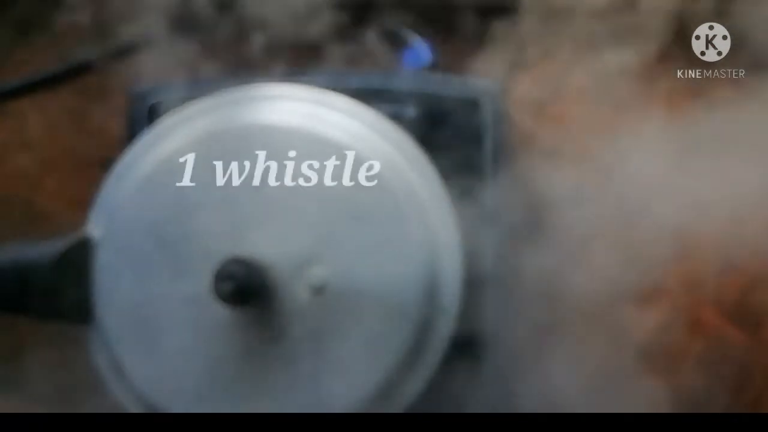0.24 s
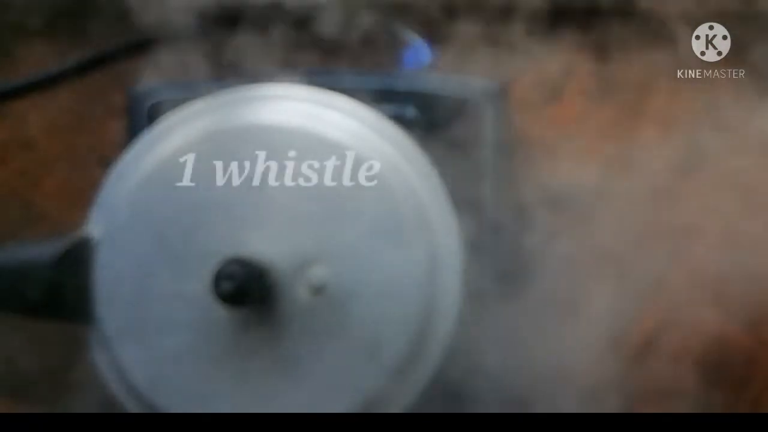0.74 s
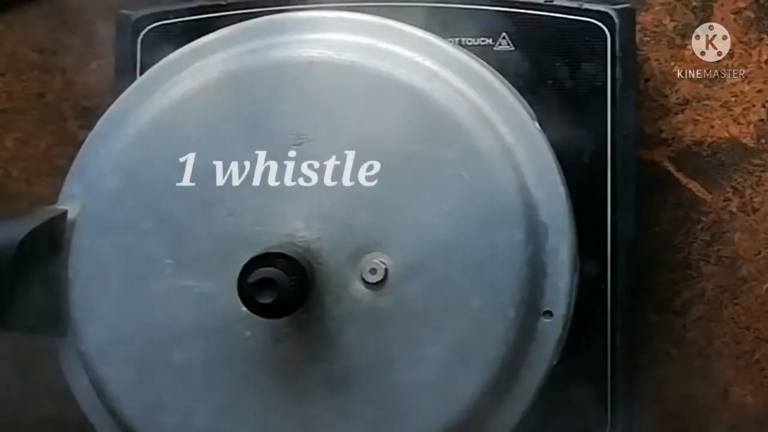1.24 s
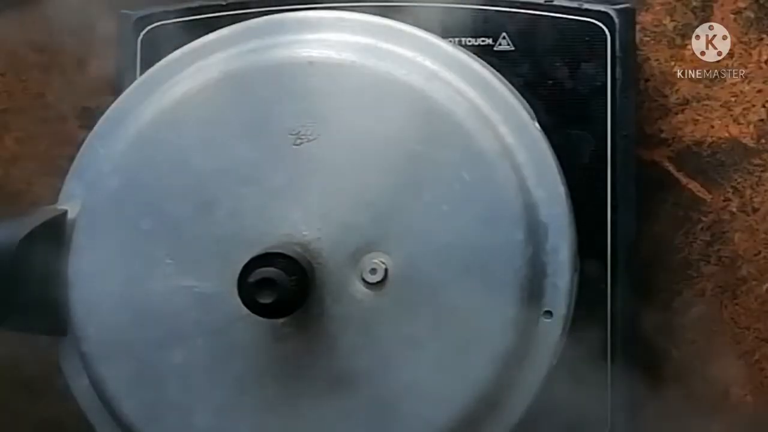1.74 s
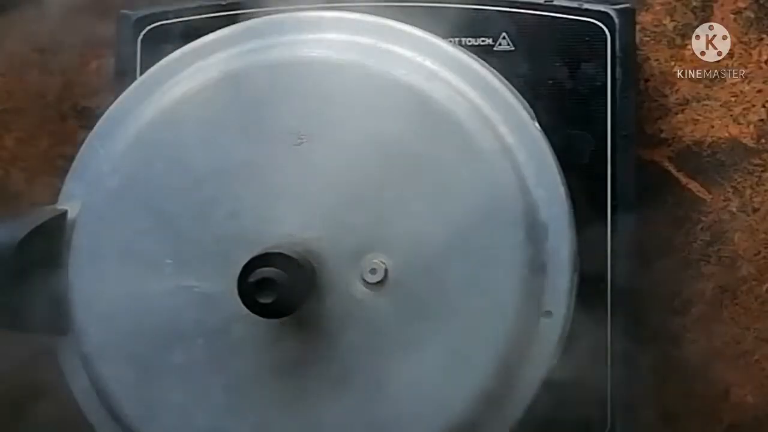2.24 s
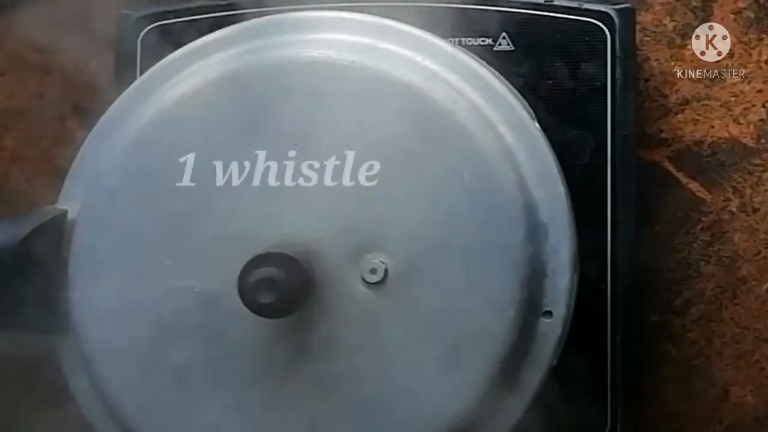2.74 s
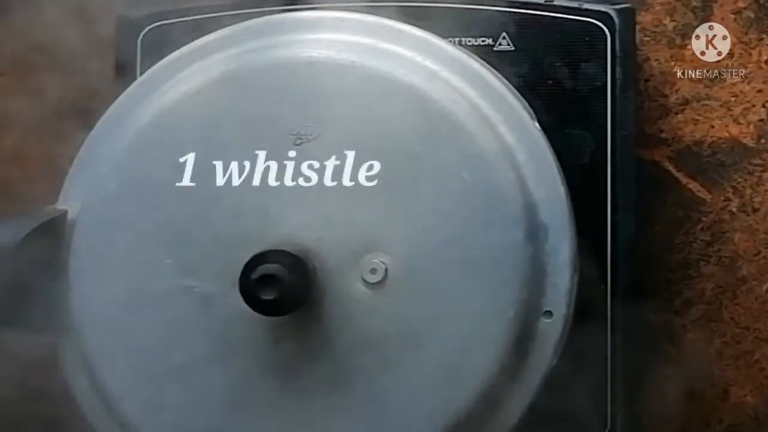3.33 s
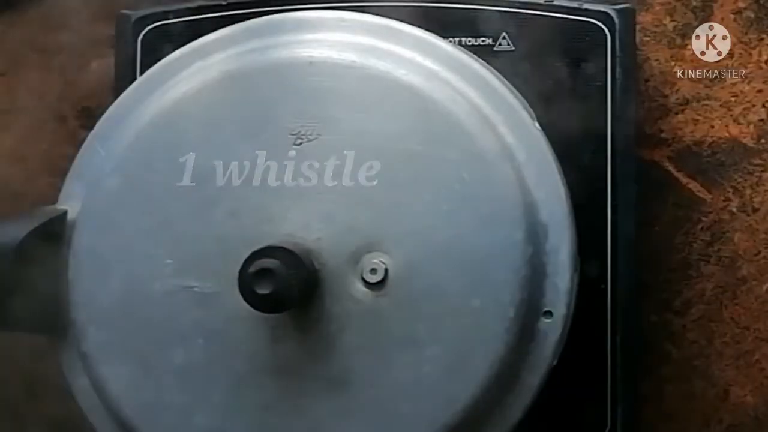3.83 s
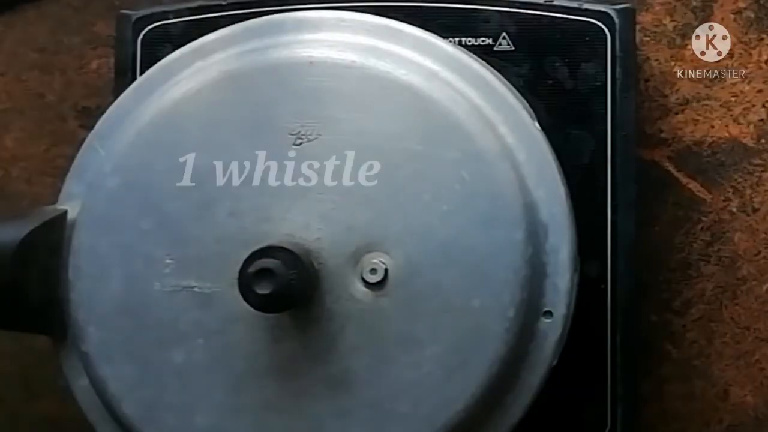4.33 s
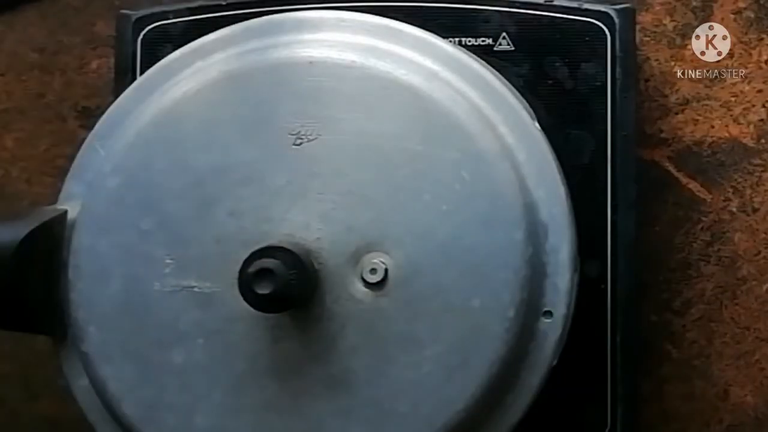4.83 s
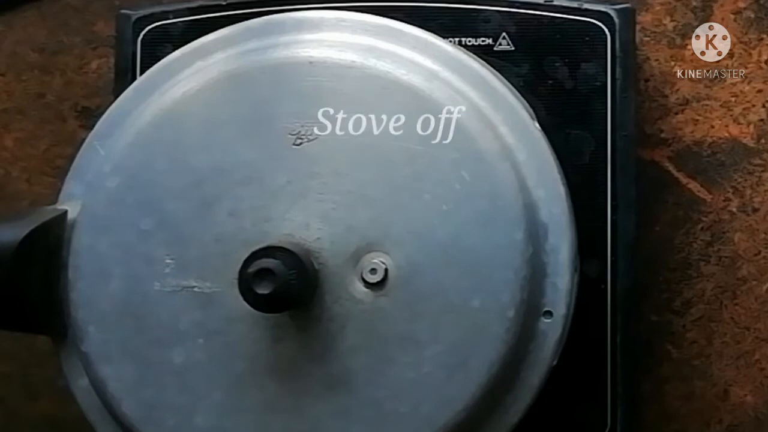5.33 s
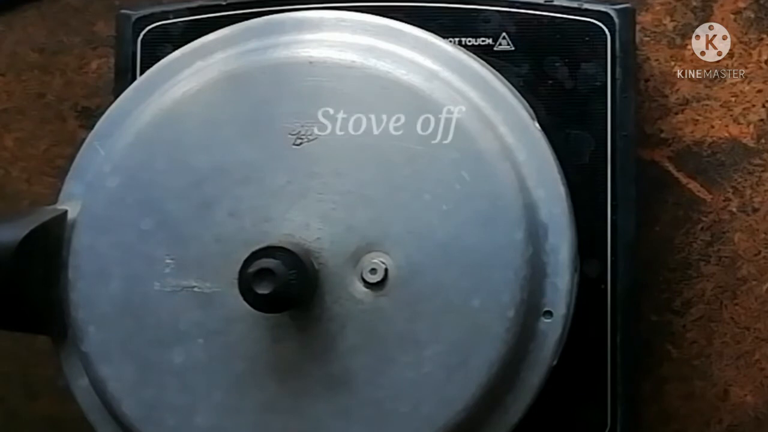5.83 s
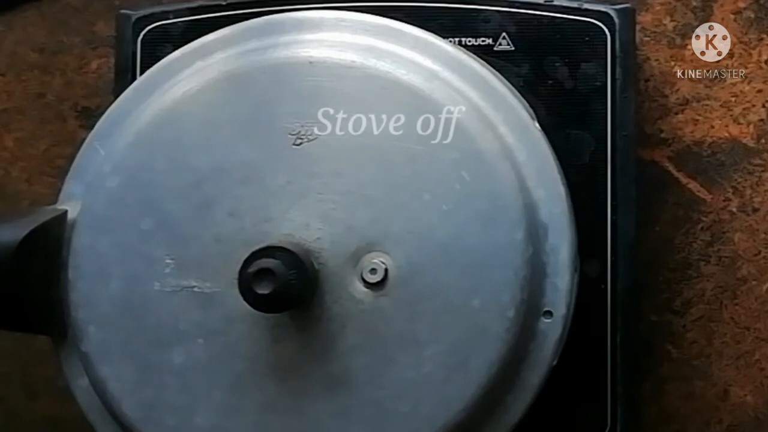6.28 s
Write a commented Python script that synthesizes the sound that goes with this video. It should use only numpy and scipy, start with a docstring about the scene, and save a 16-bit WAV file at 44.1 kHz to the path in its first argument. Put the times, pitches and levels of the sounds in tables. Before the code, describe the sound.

Close to the microphone, piercing steam with a low gusty rumble and breathy whistling tones roars from a cooker. The weight sinks, clatters on its seat, lifts for a longer blast and falls shut, bouncing softly. Only a cooling fan's airy hum remains, slowly creeping up, with tiny bird notes far away. Late on, a sudden hard clack chatters and rings metallically in the reflective kitchen, then a barely audible narrow hiss and a last peep.

```python
"""A pressure cooker is already blowing steam past its weight in a small, hard-walled kitchen.
The weight sinks, rattles with a short spurt, lifts again, then drops shut, and the hiss dies away.
A distant bird peeps faintly; a sharp clack then rings, and a thin hiss sets in before a last peep.
A fan hums throughout. Noise makes steam, air and chatter; sines make knocks, ringing, peeps and hum.
Gain control turns everything down under the loud steam and lets it creep back."""
import sys
import numpy as np
from scipy import signal
from scipy.fft import rfft, irfft, next_fast_len
from scipy.io import wavfile
from scipy.ndimage import uniform_filter1d

SR = 44100
rng = np.random.default_rng(int(sys.argv[2]) if len(sys.argv) > 2 else 0)


def store_pcm(level_fs):
    """Save levels as 16-bit WAV."""
    pcm = np.round(np.clip(level_fs, -1, 1) * 32767).astype(np.int16)
    wavfile.write(sys.argv[1], SR, np.atleast_2d(pcm).T)


N = 288855  # length in samples
TIME = np.arange(N) / SR
HZ = np.fft.rfftfreq(N, 1 / SR)


def amp(db):
    """Turns decibels into gain."""
    return 10 ** (np.asarray(db) / 20)


def read(points, hz, axis=1):
    """Reads one table column, joined by straight lines on a log-frequency axis."""
    table = np.array(points, float)
    return np.interp(np.log(hz + 1), np.log(table[:, 0] + 1), table[:, axis])


def shaped(x, gain):
    """Filters x by a gain for each frequency."""
    size = next_fast_len(N + 8192, True)
    bins = np.fft.rfftfreq(size, 1 / SR)
    return irfft(rfft(x, size) * np.interp(bins, HZ, gain), size)[..., :N]


def drift(rate_hz):
    """Makes a random wander of unit size, mostly slower than rate_hz."""
    x = shaped(rng.standard_normal(N), np.exp(-(HZ / rate_hz) ** 2))
    return x / x.std()


def add(mix, s, sound):
    """Lays a sound into the mix at s seconds."""
    part = mix[round(s * SR):][:len(sound)]
    part += sound[:len(part)]


def steam(flutter_db=2.39, flutter_hz=50):
    """The same fluttering flow of steam drives the bright jets and the low plume."""
    opening, bright_db = valve()
    flow = opening * amp(flutter_db * drift(flutter_hz))
    return jets(flow, amp(bright_db)) + plume(flow)


# Steam lifts the weight; the first lift is already under way.
# Each row: start in seconds, drop in seconds, relative flow in dB, relative treble brightness in dB.
LIFTS = [(-.3, 0.901, -3.5, -1), (0.99, 3.344, -4, -2)]
RISE_S, SHUT_S = 0.17, 0.0026  # the weight climbs steadily and falls quickly
SAG_DB_PER_S = 0.3  # the pot loses pressure while it blows
LEAK_DB, LEAK_S = -28.5, 0.18  # steam leaks on until the weight has settled
SPUTTER_DB, SPUTTER_HZ = 10, 35  # the rocking weight chops the leak
DULLING = 0.19  # dB of brightness lost for each dB less flow
SPURT_AT_S, SPURT_DB, SPURT_S = 0.945, -8, 0.014  # the weight hops once between the lifts


def valve():
    """Each lift opens the vent, holds, then drops to a short leak; gives flow and brightness in dB."""
    flow, tone = np.zeros((2, N))
    for start, drop, db, bright_db in LIFTS:
        up, down = np.maximum(TIME - start, 0), np.maximum(TIME - drop, 0)
        sputter_db = SPUTTER_DB * np.tanh(drift(SPUTTER_HZ))
        leak = amp(LEAK_DB + sputter_db) * np.exp(-(down / LEAK_S) ** 4)
        closing = np.maximum(np.exp(-down / SHUT_S), leak)
        lift = amp(db - SAG_DB_PER_S * up) * np.minimum(up / RISE_S, 1) * closing
        flow += lift
        tone += lift * bright_db
    add(flow, SPURT_AT_S, amp(SPURT_DB) * np.exp(-(TIME / SPURT_S) ** 4))
    flow += 1e-6  # avoids dividing by zero
    return flow, tone / flow + DULLING * 20 * np.log10(flow)


# How loud the hiss of the jets is at each pitch.
# Each row: frequency in Hz, relative level in dB.
JET_COLOUR = [(100, -65), (400, -47), (1000, -34.5), (1600, -29), (2400, -22.5), (2850, -23), (3150, -18.5),
              (4400, -18), (6000, -14.5), (8000, -13.5), (10000, -13), (12000, -12.5), (15200, -19.5)]
# The weight turns and aims its jets elsewhere.
# Each row: time in seconds, extra fizz in dB, left minus right in dB.
TURNING = [(0, 1.5, -0.5), (0.6, 1.5, 0.5), (0.87, 2, -0.5), (1.25, -0.5, -0.5), (1.6, 0.3, 0),
           (1.9, 0.8, 1.7), (2.35, -0.5, -0.5), (2.6, -1.3, -0.5), (3.33, 0.4, -1)]


def jets(flow, bright, jet_db=0.72, wet_db=0, turns_per_s=0.606, count=3):
    """Turbulent jets leave the holes of the weight: more pressure makes them louder and brighter."""
    at, *columns = np.transpose(TURNING)
    fizz_db, side_db = (np.interp(TIME, at, column) for column in columns)
    colour = amp(read(JET_COLOUR, HZ) + jet_db)
    low = 1 / (1 + (HZ / 3800) ** 4)
    top = 1 - 1 / (1 + (HZ / 9000) ** 4)
    lead = SR // 2  # half a second of earlier steam has already filled the room
    hiss = np.zeros((2, N))
    for k, noise in enumerate(rng.standard_normal((count, N))):
        roar, body, fizz = (shaped(noise, colour * share) for share in (low, 1 - low - top, top))
        # the tilting weight favours each hole in turn
        turn = 2 * np.pi * (turns_per_s * TIME + k / count)
        lean = np.sqrt((1 + 0.5 * np.sin(turn)) / count)
        # a faster jet trades roar for fizz
        jet = lean * flow * (roar / bright + body + whistle() + fizz * bright * amp(fizz_db))
        # each jet points elsewhere and meets other walls
        hiss += kitchen(np.r_[jet[:lead][::-1], jet], wet_db, lag=28)[:, lead:]
    return hiss * amp(np.array([side_db, -side_db]) / 2)


# Breathy tones of the vent.
# Each row: frequency in Hz, width in Hz, relative level in dB.
VENT_TONES = [(6125, 80, -43.5), (7230, 35, -53), (7080, 27, -35), (7220, 57, -38.5)]


def whistle(waver=0.003, waver_hz=5):
    """The vent's breathy tones are narrow bands of noise that wander together in pitch."""
    bend = np.cumsum(1 + waver * drift(waver_hz)) / SR
    out = np.zeros(N)
    for hz, width, db in VENT_TONES:
        breath = drift(width) + 1j * drift(width)
        out += amp(db) * (breath * np.exp(2j * np.pi * hz * bend)).real
    return out


# The turbulent plume buffets the air.
# Each row: frequency in Hz, relative noise level in dB.
PLUME_RUMBLE = [(20, -39), (80, -34), (150, -37), (300, -37.5), (550, -38.5), (1000, -37.5), (2500, -79)]
# Puffs of the plume brush the microphone.
# Each row: middle in seconds, spread in seconds, extra level in dB.
PUFFS = [(0.766, 0.019, 10.5), (0.882, 0.026, 9.5), (1.14, 0.018, 6.5), (1.482, 0.049, 1.5),
         (2.454, 0.01, 3), (3.327, 0.028, 7)]


def plume(flow, plume_db=7.5, wet_db=-3):
    """The turbulent cloud of steam rumbles in gusts, with short puffs at the microphone."""
    gust_db = 1.3 * drift(18)
    for at, spread, db in PUFFS:
        gust_db += db * np.exp(-((TIME - at) / spread) ** 2)
    rumble = shaped(rng.standard_normal(N), amp(read(PLUME_RUMBLE, HZ)))
    return kitchen(flow * rumble * amp(plume_db + gust_db), wet_db, lag=28)


# The weight knocks on its seat.
# Each row: start in seconds, relative level in dB, centre of the knock in Hz.
KNOCKS = [(0.9274, -21.5, 1600), (0.9552, -27, 1660), (0.9829, -26.5, 1400), (0.991, -33, 790),
          (1.0107, -28.5, 935), (1.029, -38, 800), (1.061, -41, 850), (3.3682, -30, 960),
          (3.4123, -30.5, 1800), (3.415, -32.5, 900), (3.4372, -36.5, 800), (3.439, -35, 1950),
          (3.4547, -35, 1200), (3.462, -39, 890), (3.473, -38, 1730), (3.485, -44.5, 920),
          (3.543, -45.5, 1000), (3.567, -47, 930)]
# Ways the lid under the weight can ring.
# Each row: nominal frequency in Hz, relative level in dB, time to fall by 60 dB in seconds.
LID_MODES = [(356, 8.5, 0.28), (690, 3, 0.022), (800, -1, 0.059), (905, -1.5, 0.087), (1063, 2, 0.032),
             (1370, 0.5, 0.035), (1795, 2.5, 0.032), (1860, -8, 0.034), (1950, -2, 0.027)]


def weight(knock_db=-0.5, wet_db=-6.0, octaves=0.35, rebound_db=-14, rebound_s=0.028, detune=0.042, count=3):
    """As the flow fails, the weight bounces on the vent and rings the lid, each touch a bit different."""
    out, t = np.zeros(N), np.arange(SR // 5) / SR
    for s, db, centre_hz in KNOCKS:
        # it rocks and touches again, ever more lightly
        touches = s + np.r_[0, np.cumsum(rebound_s * rng.uniform(0.4, 1.4, count))]
        for order, (hz, mode_db, t60) in enumerate(LID_MODES):
            # neighbouring modes swing opposite ways; those near the centre ring most
            reach = (-1) ** order / (1 + (np.log2(hz / centre_hz) / octaves) ** 2)
            for k, at in enumerate(touches):
                pitch = hz * (1 + detune * rng.uniform(-1.2, 1))
                fade = amp(db + mode_db + k * rebound_db - 60 * t / t60)
                add(out, at, reach * fade * np.sin(2 * np.pi * pitch * t))
    return amp(knock_db) * kitchen(out, wet_db)


# Blows of the clack; a harder contact has more treble.
# Each row: start in seconds, relative level in dB, chatter's 60 dB fall in seconds before the
# faster settling, extra treble in dB.
BLOWS = [(5.254, -1, 0.33, 2), (5.2795, -0.5, 0.71, -21), (5.293, -5, 0.15, 9), (5.312, -17, 0.12, 9),
         (5.338, -12, .12, -3)]


def clack(settle_s=0.16):
    """A sharp snap and its rebounds: loose parts chatter, build up a metallic ring and settle."""
    power, sharp, t = np.zeros(N), np.zeros(N), np.arange(SR) / SR
    for s, db, t60, treble_db in BLOWS:
        blow = amp(db - 60 * t / t60) ** 2 * np.exp(-(t / settle_s) ** 4)
        add(power, s, blow)
        add(sharp, s, blow * amp(treble_db) ** 2)
    return chatter(power, sharp) + ring(power)


# How loud the chatter is at each pitch.
# Each row: frequency in Hz, relative level in dB.
CHATTER_COLOUR = [(150, -54), (230, -29), (400, -38), (700, -32.5), (1000, -28.5), (1500, -32.5),
                  (2300, -26), (3200, -23.5), (4400, -24), (6000, -24), (8000, -29), (9300, -30.5),
                  (11500, -29.5), (13000, -22), (14800, -31)]


def chatter(power, sharp, wet_db=-10, grain_db=2.0):
    """Many tiny contacts make grainy noise, whose treble follows the hardness of each blow."""
    contacts = rng.standard_normal(N) * amp(grain_db * drift(400))
    colour = amp(read(CHATTER_COLOUR, HZ))
    top = HZ ** 4 / (HZ ** 4 + 5600.0 ** 4)
    dull = shaped(contacts * np.sqrt(power), colour * (1 - top))
    keen = shaped(contacts * np.sqrt(sharp), colour * top)
    return kitchen(dull + keen, wet_db)


# What the clack rings with.
# Each row: centre frequency in Hz, relative level in dB, time to fall by 60 dB in seconds,
# left minus right in dB, spread of the close modes in Hz.
RING_MODES = [(406, -8.5, 0.85, 2, 45), (1020, 1, 0.29, -3, 50), (1825, 0.5, 0.27, 5, 90),
              (2240, 11.5, 0.27, 5, 55), (2650, 4, 0.19, 1, 150), (3100, 5, 0.15, 7, 73),
              (3558, 1, 0.33, -8, 12), (4350, 7, 0.19, -8, 120), (4920, -4, 0.38, -6, 45),
              (5740, 9.5, 0.34, -4, 85), (6170, 5.5, 0.25, -7, 55), (6520, -2, .3, -4, 83),
              (6910, 2, 0.29, 1, 45), (7381, -4, .26, -5, 50), (8260, 1.5, 0.13, -5, 110),
              (10100, 1, 0.12, -5, 130), (11800, -3, 0.11, -4, 130), (12600, 3, 0.08, -2, 90),
              (13290, 3, 0.11, 0, 130), (14750, -5, 0.12, -3, 170)]


def ring(power, ring_db=-44, build_s=0.012, count=5):
    """The blows feed energy into clusters of close modes, which beat together as they die away."""
    out, t, start = np.zeros((2, N)), np.arange(SR) / SR, BLOWS[0][0]
    fed = power[round(start * SR):][:len(t)] + 1e-20
    for hz, db, t60, side_db, split_hz in RING_MODES:
        keep = amp(-60 / (t60 * SR)) ** 2  # share of a mode's energy left after one sample
        size = np.sqrt(signal.lfilter([1 / (build_s * SR)], [1, -keep], fed) / count)
        cluster = hz + split_hz * (np.linspace(-1, 1, count) + rng.uniform(-1.0, 1, count) / 2)
        # each port stands elsewhere in the modes' field
        for port, port_db in zip(out, (db + side_db / 2, db - side_db / 2)):
            tones = sum(np.sin(2 * np.pi * (f * t + rng.random())) for f in cluster)
            add(port, start, amp(ring_db + port_db) * size * tones)
    return out


# A distant bird's faint peeps.
# Each row: start in seconds, length in seconds, starting pitch in Hz, glide in octaves,
# relative level in dB.
PEEPS = [(3.84, 0.074, 3500, 0, -52.5), (3.886, 0.035, 3525, 0, -55), (4.3, 0.05, 3480, -0.03, -60),
         (4.717, 0.06, 3520, -0.06, -63), (5.107, 0.09, 4700, -0.8, -64), (6.272, 0.06, 3900, -0.16, -65)]


def peeps(wet_db=-13, rough=0.3, waver_share=0.0043):
    """Thin bird notes, barely above the fan, glide with an unsteady pitch and level."""
    out, waver, tremble = np.zeros(N), drift(90), 1 + rough * drift(120)
    for s, length, hz, glide, db in PEEPS:
        swell = np.hanning(int(length * SR))
        unsteady = 1 + waver_share * waver[int(s * SR):][:len(swell)]
        pitch = hz * 2 ** np.linspace(0, glide, len(swell)) * unsteady
        add(out, s, amp(db) * swell * np.sin(2 * np.pi * np.cumsum(pitch) / SR))
    return kitchen(out * tremble, wet_db)


def thin_hiss(at_s=5.62, rise_s=0.11, level_db=-66, centre_hz=3100, width_hz=460):
    """A narrow band of noise sets in after the clack, barely above the fan."""
    gain = 1 / (1 + (2 * (HZ - centre_hz) / width_hz) ** 4)
    band = shaped(rng.standard_normal((2, N)), gain)
    return amp(level_db) * np.clip((TIME - at_s) / rise_s, 0, 1) * band / band.std()


def cooktop():
    """The cooktop's cooling fan pushes air and hums."""
    return fan_air() + fan_hum()


# Air noise of the cooktop.
# Each row: frequency in Hz, relative noise level in dB.
FAN_AIR = [(25, -42.5), (50, -44.5), (120, -42.5), (210, -46.5), (370, -39), (570, -46.5), (780, -41),
           (930, -43.5), (1120, -42), (1230, -47), (1480, -43.5), (1750, -48.5), (2500, -49), (4500, -56),
           (7000, -59.5), (9000, -61.5), (11000, -54.5), (14500, -62)]


def fan_air():
    """Rushing air is steady noise with a slight, slow swell."""
    return air(FAN_AIR) * amp(0.4 * drift(2.5))


# How alike the two microphones hear the fan's air: 1 is the same, below 0 leans to opposite.
# Each row: frequency in Hz, left-right likeness without a unit.
LIKENESS = [(60, 1), (130, 1), (290, 0.92), (640, -0.37), (1410, 0.58), (3100, -0.13), (6820, 0.23),
            (15000, -0.35)]


def air(spectrum):
    """Diffuse noise reaches two microphones, alike in the bass."""
    a, b = rng.standard_normal((2, N))
    gain, same = amp(read(spectrum, HZ)), np.clip(read(LIKENESS, HZ), -1, 1)
    right = shaped(a, gain * same) + shaped(b, gain * np.sqrt(1 - same ** 2))
    return np.array([shaped(a, gain), right])


# Motor and mains lines of the fan.
# Each row: middle frequency in Hz, relative level in dB.
HUM_LINES = [(102.3, -79), (251, -74), (301.5, -68), (400, -69.5), (430.7, -67), (500.6, -70.5),
             (602.9, -74), (701, -68.5), (802, -72.5), (856.5, -68.5), (1002, -71.5), (1104, -72.5),
             (1362, -72), (1530, -81)]


def fan_hum(waver_hz=1.53, flutter_db=2):
    """Motor and mains lines waver in pitch and level."""
    out = np.zeros((2, N))
    wander = [np.cumsum(drift(6.17)) / SR for _ in range(3)]
    flutter = amp(flutter_db * drift(2.5))
    for k, (hz, db) in enumerate(HUM_LINES):
        turns = hz * TIME + waver_hz * wander[k % len(wander)] + rng.random()
        apart = 0.067 * rng.standard_normal((2, 1))  # standing waves reach each port in another phase
        level = np.sqrt(2) * amp(db) * np.roll(flutter, rng.integers(N))
        out += level * np.sin(2 * np.pi * (turns + apart))
    return out


# How the kitchen echoes.
# Each row: frequency in Hz, time to fall by 60 dB in seconds, relative reflection level in dB.
ROOM = [(40, 0.44, -41), (120, 1, 5.5), (296, 0.24, 0), (975, 0.46, 4.5), (2900, 0.48, 5.5),
        (5950, 0.54, 6), (10170, 0.41, 2.5), (14400, 0.28, 7.5)]


def kitchen(x, wet_db, lag=2):
    """Direct sound, lag samples later on the left, meets dense reflections that die by band."""
    hz, t, z = signal.stft(rng.standard_normal((2, 30000)), SR, nperseg=512)
    t60 = read(ROOM, hz)[:, None]
    wet = amp(read(ROOM, hz, axis=2) + wet_db)[:, None]
    # the square root evens out the energy of long and short tails
    z *= wet * np.exp(-np.log(1000) * t / t60) * np.sqrt(2 * np.log(1000) / (t60 * SR))
    tail = signal.istft(z, SR, nperseg=512)[1]
    direct = np.array([np.roll(x, lag), x])
    return direct + signal.fftconvolve(x[None], tail, axes=1)[:, :len(x)]


def scene():
    """Everything in the kitchen, left and right."""
    return steam() + weight() + clack() + peeps() + thin_hiss() + cooktop()


def gain_control(x, threshold_db=-16, ratio=2.36, recover_db_per_s=22):
    """The gain drops quickly under the loud steam and creeps back, so the fan sinks away and returns."""
    power_db = 10 * np.log10(abs(uniform_filter1d((x ** 2).mean(0), size=1500)) + 1e-12)
    fall = recover_db_per_s * TIME
    held_db = np.maximum.accumulate(power_db + fall) - fall  # peaks, falling at the recovery rate
    over_db = np.maximum(held_db - threshold_db, 0)
    return x * amp(-(1 - 1 / ratio) * uniform_filter1d(over_db, size=400))


# Resonances of the two microphone ports.
# Each row: frequency in Hz, width in Hz, boost or cut in dB.
LEFT_PORT = [(1660, 220, 3.5), (3870, 470, 3), (6900, 860, -6), (8500, 670, 5), (9810, 390, 6),
             (10250, 590, 6), (11570, 1320, 10), (14700, 1450, 13)]
RIGHT_PORT = [(4850, 95, 6.5), (6064, 250, 4), (6780, 1560, 10), (7020, 400, 3.5), (8620, 390, 7.5),
              (10100, 500, 2.5), (9630, 530, 5), (12160, 500, 3.5), (13900, 2000, -2.5)]
KNEE, CEILING = 0.6, 0.88  # where peaks begin to round off, and where they stop
EDGE_HZ = 15400  # upper band limit


def record(dry):
    """Port resonances colour each side; then come gain control, rounded peaks and the band limit."""
    heard = []
    for x, port in zip(dry, (LEFT_PORT, RIGHT_PORT)):
        port_db = sum(db / (1 + (2 * (HZ - hz) / width) ** 2) for hz, width, db in port)
        heard.append(shaped(x, amp(port_db)))
    heard = gain_control(np.array(heard))
    within = np.clip(heard, -KNEE, KNEE)
    heard = within + (CEILING - KNEE) * np.tanh((heard - within) / (CEILING - KNEE))
    lowpass = signal.firwin(401, EDGE_HZ, window=("kaiser", 9), fs=SR)
    return signal.oaconvolve(heard, lowpass[None], "same", axes=1)


dry = scene()
out = record(dry)
store_pcm(out)
```